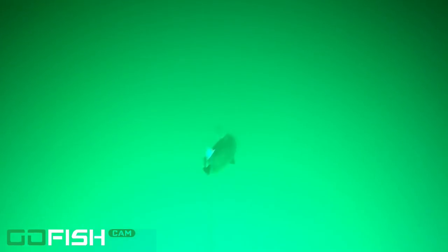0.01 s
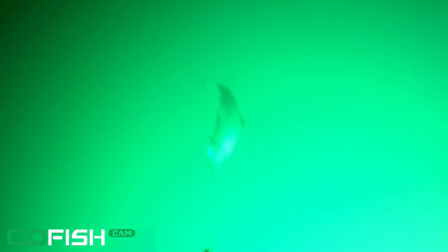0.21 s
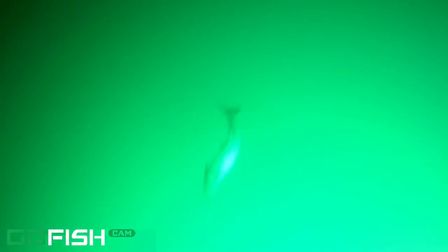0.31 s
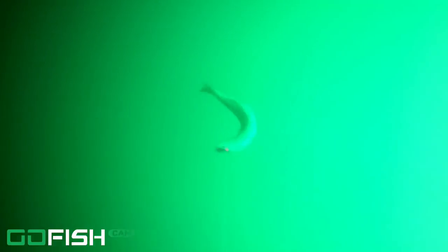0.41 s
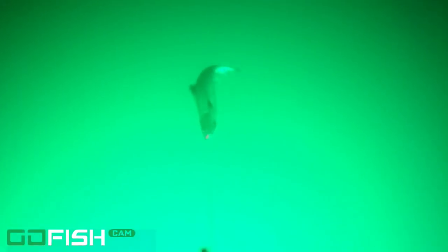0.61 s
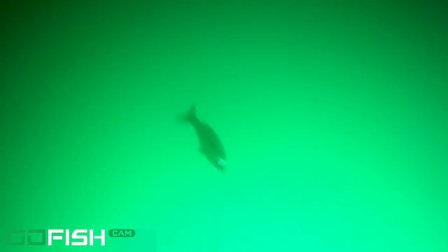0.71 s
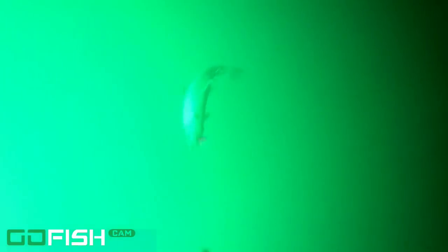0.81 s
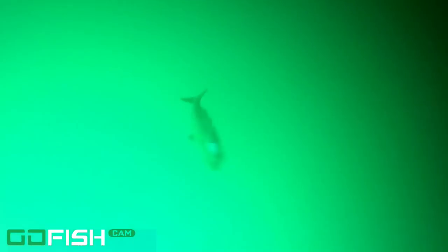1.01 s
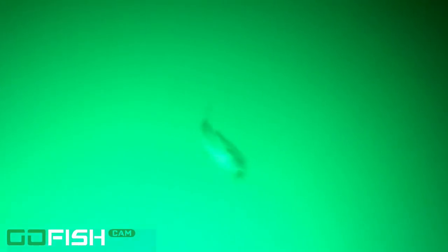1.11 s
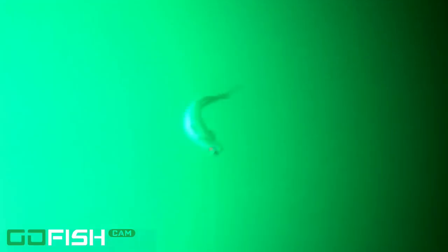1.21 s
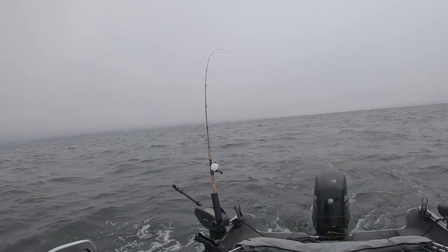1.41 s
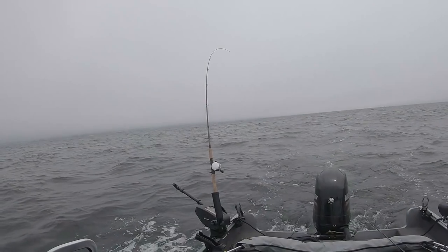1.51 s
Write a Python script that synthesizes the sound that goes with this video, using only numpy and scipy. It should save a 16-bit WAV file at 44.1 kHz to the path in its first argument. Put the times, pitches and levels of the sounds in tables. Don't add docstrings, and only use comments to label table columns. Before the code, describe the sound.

Loud, dry, creaky rattling of a fishing line on a small plastic underwater housing, in irregular bursts with brief gaps over faint rushing water, then a click and a sudden cut to quiet wind and low engine throb.

```python
import sys
import numpy as np
from scipy import signal
from scipy.fft import rfft, irfft, next_fast_len
from scipy.io import wavfile
from scipy.ndimage import uniform_filter1d, minimum_filter1d, map_coordinates

SR = 44100
rng = np.random.default_rng(int(sys.argv[2]) if len(sys.argv) > 2 else 0)


def gain_from_db(level_db):
    decades = np.asarray(level_db, float) / 20
    return 10 ** decades


def put_to_file(sound):
    columns = np.atleast_2d(sound).T
    safe = np.clip(columns, -1, 1)
    whole_steps = np.round(safe * 32767)
    wavfile.write(sys.argv[1], SR, whole_steps.astype(np.int16))


N = 70560
T = np.arange(N) / SR

# start in seconds, length in seconds, level in dB,
# low housing ring compared with the main ring in dB.
SCRAPES = [(0.002, 0.04, -31, 8), (0.05, 0.02, -32, 8.5), (0.116, 0.017, -34, -2),
           (0.144, 0.011, -24.5, 13.5), (0.157, 0.013, -21.5, 11), (0.198, 0.011, -27, 20.5),
           (0.203, 0.047, -11.5, 1), (0.249, 0.033, -17.5, -1), (0.279, 0.044, -22.5, 5),
           (0.32, 0.027, -16.5, 8), (0.355, 0.023, -12, 6), (0.375, 0.02, -23, 2), (0.391, 0.029, -19, 11),
           (.438, 0.004, -39, -12.5), (0.488, 0.02, -26, 14), (0.505, 0.032, -12.5, 6.5),
           (0.544, 0.043, -8, -2), (0.582, 0.028, -16, 3), (0.618, 0.031, -19.5, 3.5),
           (0.641, 0.024, -12, 4.5), (0.659, 0.021, -24.5, -1), (0.721, 0.013, -25.5, 12),
           (0.795, 0.028, -23.5, 13.5), (0.822, 0.02, -24, 15), (0.835, 0.051, -8.5, -3.5),
           (0.881, 0.042, -25.5, 5.5), (0.932, 0.016, -12.5, 9), (0.946, 0.037, -7.5, 0.5),
           (0.988, 0.015, -24.5, 8.5), (1.004, 0.026, -20, 8), (1.025, 0.032, -20, 10),
           (1.05, 0.028, -29, 10.5), (1.1, 0.023, -14.5, 9), (1.133, 0.012, -7, 13), (1.142, 0.015, -6, -1),
           (1.156, 0.028, -20, 10.5), (1.179, 0.088, -12.5, 3.5), (1.3, 0.04, -40.5, -2)]
SCRAPE_RISE_S, SCRAPE_FALL_S = 0.0054, 0.008
# time in seconds, peak in dB.
TICKS = [(0.0545, -24.5), (0.0599, -25), (0.0632, -27), (0.1246, -22.5), (0.148, -25), (0.1633, -25),
         (0.44, -22), (0.479, -19), (0.726, -20), (1.3037, -26.5)]
# time in seconds, peak in dB, ringing pitch in Hz.
JOLTS = [(0.0635, -21.5, 2586), (0.1271, -19.5, 3040), (0.151, -17, 2860), (0.1625, -17.5, 2680),
         (0.2103, -5, 2690), (0.2195, -9, 2530), (0.2324, -2.5, 2790), (0.2398, -1, 2830),
         (0.2597, -8.3, 2740), (0.2905, -5.5, 2610), (0.3034, -9, 2460), (0.313, -9.5, 2480),
         (0.335, -5, 2380), (0.3636, -8, 2520), (0.3668, -7.5, 2520), (0.4055, -6.5, 2460),
         (0.4136, -9.5, 2370), (0.4412, -17.5, 2690), (0.4987, -16, 2960), (0.5168, 0.4, 2660),
         (0.525, -4.5, 2630), (0.5322, -4.5, 2740), (0.5515, -3, 2790), (0.5595, -0.5, 2620),
         (0.5696, 0.25, 2740), (0.5736, -3.5, 2850), (0.5903, -7, 2600), (0.6035, -10, 2360),
         (0.6344, -9, 2580), (0.656, -6.5, 2640), (0.8001, -15, 2630), (0.8113, -9.5, 2880),
         (0.8315, -14.5, 2750), (0.8406, -8.2, 2700), (0.8464, -4, 2510), (0.8573, 2.33, 2580),
         (0.867, -2, 2640), (0.8763, -9, 2580), (0.8808, -5, 2900), (0.8988, -13, 2630),
         (0.9392, -8.5, 2960), (0.9599, -0.5, 2940), (0.968, 1.2, 2690), (0.9732, 1.3, 2530),
         (1.0185, -15, 2583), (1.0393, -14.5, 2770), (1.0458, -11.7, 2660), (1.1093, -6.5, 2740),
         (1.1161, -16, 2860), (1.141, -3, 2640), (1.1497, -0.8, 2800), (1.1643, -7.5, 2630),
         (1.1966, -7.4, 2810), (1.2051, -3, 2730), (1.2129, -4, 2620), (1.2445, -6.5, 2840),
         (1.2599, -6, 2850)]
JOLT_BEAT, JOLT_LOW = 0.54, 0.12
# time in seconds, regular slips per second, regular share from 0 to 1.
CREAK = [(0, 600, .2), (.22, 670, .45), (.272, 810, .75), (.305, 555, .55), (.37, 585, .45),
         (.415, 500, .35), (.53, 610, .4), (.56, 700, .4), (.655, 750, .5), (.81, 680, .45), (.87, 700, .3),
         (.94, 600, .35), (1.11, 560, .3), (1.185, 575, .75), (1.207, 655, .8), (1.222, 625, .8),
         (1.233, 725, .7), (1.27, 715, .75)]
# pitch in Hz, width in Hz, level in dB.
SHELL = [(2136, 210, 1.5), (2428, 404, 6.5), (2690, 490, 7), (3290, 470, -2.5), (3750, 110, -45)]
# pitch in Hz, width in Hz, level in dB.
SHELL_LOW = [(796, 380, -24.5), (1270, 540, -14), (1381, 294, -2), (1757, 450, -4.5)]
# pitch in Hz, width in Hz, level in dB.
SHELL_TOP = [(5035, 370, -24), (9130, 2200, -39)]
# pitch in Hz, width in Hz, level in dB.
TICK_MODES = [(3950, 260, 9), (4960, 500, 0)]
# pitch in Hz, width in Hz, level in dB.
BODY = [(682, 380, -21.5)]
# start in seconds, length in seconds, first Hz, last Hz,
# level in dB.
OVERTONES = [
    (.204, 0.029, 1320, 1274, -24.5),
    (.253, 0.029, 3420, 3210, -24),
    (.298, .022, 1685, 1626, -26),
    (.522, 0.022, 2860, 3020, -21),
    (.563, .02, 3475, 3410, -18.5),
    (.644, .02, 1520, 1474, -23),
]
# start in seconds, length in seconds, first Hz, last Hz, level in dB.
WHISTLES = [(0, .115, 555, 530, -43), (.11, .11, 525, 560, -42), (.29, .06, 580, 500, -46),
            (.375, .055, 580, 380, -46), (.43, .065, 560, 530, -46), (.59, .025, 540, 520, -48),
            (.685, .035, 530, 540, -44), (.745, .06, 510, 550, -46), (.81, .04, 470, 430, -45),
            (.8, .055, 720, 600, -45), (.91, .045, 500, 600, -49), (.99, .07, 430, 340, -49),
            (1.085, .09, 520, 470, -47), (1.165, .04, 540, 620, -47), (1.195, .045, 650, 635, -40),
            (1.23, .045, 570, 440, -45)]
# time in seconds, level in dB, pitch in Hz.
THUDS = [
    (0.507, -40.5, 92),
    (0.569, -63, 50),
    (0.968, -54, 61),
]
# start in seconds, length in seconds, level in dB.
BUBBLES = [
    (0.357, 0.013, -50),
    (0.412, 0.009, -42),
    (0.477, 0.033, -51),
    (1.028, 0.007, -43.5),
    (1.093, 0.033, -48),
    (0.706, .02, -55),
]
# frequency in Hz, level in dB.
FLOW = [(30, -34), (200, -20.5), (450, -13.5), (800, -16), (1200, -9), (1800, -22.5), (2700, -7.5),
        (4000, -20), (4700, -22), (6000, -34), (8000, -120)]
# frequency in Hz, level in dB.
HISS = [(3000, -37), (4800, -1.5), (6500, 2.5), (8000, 3.5), (14600, 4), (15400, 8.5), (15900, 4)]
# time in seconds, throb in dB, fourth order in dB.
ENGINE = [(1.345, -44, -41.5), (1.359, -31.5, -39), (1.374, -33.5, -51), (1.421, -32, -42.5),
          (1.463, -36, -42), (1.487, -43, -51), (1.507, -45, -43.5), (1.541, -41, -52), (1.6, -35, -66)]
# frequency in Hz, level in dB.
WIND = [(20, -10), (45, 0.5), (90, -9), (230, -14), (450, -23), (1300, -22), (5900, -37), (7200, -45.5),
        (9000, -65), (10200, -74), (12000, -120)]
CUT_S = 1.33516


def scrape_pushes():
    shapes = []
    for start, length, db, _ in SCRAPES:
        swell = np.sin(np.pi * np.clip((T - start) / length, 0, 1))
        arch = 0.65 + 0.35 * np.minimum(1, length / 0.025 * swell)
        shapes.append(gain_from_db(db) * stroke(start, length, SCRAPE_RISE_S, SCRAPE_FALL_S) * arch)
    shapes = np.array(shapes)
    return shapes.sum(0), gain_from_db(np.array(SCRAPES)[:, 3]) @ shapes


def creak():
    s, rate, share = np.transpose(CREAK)
    cycles = np.cumsum(np.interp(T, s, rate) * (1 + 0.055 * wobble(250))) / SR
    clicks = np.diff(np.floor(cycles), prepend=0) * gain_from_db(2.2 * rng.standard_normal(N))
    return unit(clicks - clicks.mean()), np.interp(T, s, share)


def slips():
    chatter_db = 0
    draw = rng.random((3, N))
    size = gain_from_db(-2.5 * np.log(draw[1] + 1e-4) + chatter_db * wobble(140))
    return unit((draw[0] < 4000 / SR) * np.sign(draw[2] - 0.5) * size)


def scraping(push, low_push):
    shell, shell_low = resonances(SHELL), resonances(SHELL_LOW)
    tap = filtered(1.0 * (np.arange(N) == 0), shell)
    tap_size, tap_peak = np.linalg.norm(tap), np.abs(tap).max()

    ticks, grip = np.zeros(N), gain_from_db(1.6 * wobble(130))
    for s, db in TICKS:
        ticks[round(s * SR)] = gain_from_db(db)
        grip = grip * (1 - min(gain_from_db(db), 0.8) * np.exp(-((T - s) / 0.0015) ** 2))

    clicks, share = creak()
    even = np.sqrt(grip * share) * clicks
    rough = grip * np.sqrt(1 - share) * slips()
    rub = filtered(even * push, shell) + filtered(even * low_push, shell_low)
    rub += gliding(rough * push, SHELL) + gliding(rough * low_push, SHELL_LOW)
    rub = sealed(rub / tap_size)

    blows = sealed(filtered(ticks, lambda f: shell(f) + 2.5 * shell_low(f)) / tap_peak)
    light = filtered(ticks * (ticks < 0.2), resonances(TICK_MODES)) / tap_peak
    top = filtered(slips() * push, resonances(SHELL_TOP)) / tap_size
    body = gliding(rough * low_push, BODY) / tap_size
    snags, free = jolts()
    return limited(gain_from_db(-0.5) * rub) * free + snags + blows + top + light + body


def jolts():
    out, free = np.zeros(N + SR), np.ones(N + SR)
    t = np.arange(-200, 500) / SR
    draws = rng.uniform(-1.017, 1, (len(JOLTS), 2))
    for (s, db, hz), (side, turn) in zip(JOLTS, draws):
        rise_s = 0.0014 if db > -16 else 0.0004
        shape = np.where(t < 0, np.exp(-(t / rise_s) ** 2), np.exp(-np.abs(t / 0.0023) ** 1.22))
        wave = lambda ratio: np.cos(2 * np.pi * (hz * ratio * t + turn))
        neighbour = wave(1 + 0.1 * (side + np.sign(side)))
        ring = wave(1) + JOLT_BEAT * neighbour + JOLT_LOW * wave(0.5 + 0.13 * side)
        first = round((s + t[0]) * SR)
        out[first:][:len(t)] += gain_from_db(db + 0.5) * shape * ring / (1 + JOLT_BEAT)
        free[first:][:len(t)] *= 1 - 0.75 * shape
    return out[:N], free[:N]


def gliding(drive, modes):
    out = np.zeros(N)
    for mode in modes:
        lag = filtered(wobble(30) * 0.04, lambda hz: 1 / (2j * np.pi * hz + 60)) * SR
        ring = map_coordinates(filtered(drive, resonances([mode])), [np.arange(N) + lag], mode="nearest")
        out += gain_from_db(2.5 * wobble(45.02)) * ring
    return out


def sealed(x):
    low = signal.butter(N=8, Wn=3986, btype="low", fs=SR, output="sos")
    high = signal.butter(N=8, Wn=825, btype="high", fs=SR, output="sos")
    return signal.sosfilt(high, signal.sosfilt(low, x))


def limited(x):
    need = np.minimum(1, 0.72 / (np.abs(x) + 1e-9))
    return x * uniform_filter1d(minimum_filter1d(need, size=122), size=61)


def cut_click():
    swell = np.exp(np.minimum(T - CUT_S, 0) / 0.00024)
    return gain_from_db(-5.5) * swell * np.cos(2 * np.pi * 2750 * (T - CUT_S) + 0.6)


def whistle(rows):
    waver, out = 1 + 0.04 * wobble(90), np.zeros(N)
    for s, length, first_hz, last_hz, db in rows:
        hz = np.interp(T, [s, s + length], [first_hz, last_hz]) * waver
        out += gain_from_db(db) * stroke(s, length, 0.012, 0.012) * np.sin(2 * np.pi * np.cumsum(hz) / SR)
    return np.sqrt(2) * gain_from_db(3 * wobble(49.45)) * out


def soft_bumps():
    out = np.zeros(N)
    for s, db, hz in THUDS:
        out += gain_from_db(db) * np.exp(-((T - s) * hz * 1.9) ** 2) * np.sin(2 * np.pi * hz * (T - s))
    return out


def bubbles():
    fizz = unit(filtered(rng.standard_normal(N), resonances([(10460, 1600, 0)])))
    return fizz * sum(gain_from_db(db) * stroke(s, length, 0.0039, 0.004) for s, length, db in BUBBLES)


def murmur():
    return gain_from_db(-46.5) * unit(filtered(rng.standard_normal(N), resonances([(491, 197, 0)])))


def water_gain(push):
    hold = 700
    held = -minimum_filter1d(-push ** 2, size=hold, origin=hold // 2 - 1)
    heard = filtered(held, lambda hz: 1 / (1 + 2j * np.pi * hz * 0.011))
    return (1 + np.abs(heard) / gain_from_db(2 * -19.5)) ** -0.5


def under_water():
    push, low_push = scrape_pushes()
    rattle = scraping(push, low_push)
    hum = murmur()
    pocket = bubbles() + soft_bumps() + whistle(WHISTLES)
    flow = gain_from_db(-38.5 + 1.5 * wobble(31.37)) * rush(FLOW, 1.5)
    hiss = gain_from_db(-45.5) * rush(HISS, 0.7)
    return rattle + pocket + water_gain(push) * (flow + hiss + hum)


def deck():
    s, throb_db, order_db = np.transpose(ENGINE)

    def tone(hz):
        return np.sqrt(2) * np.sin(2 * np.pi * np.cumsum(hz * (1 + 0.016 * wobble(30.1))) / SR)

    throb = gain_from_db(np.interp(T, s, throb_db)) * tone(40.8)
    order = gain_from_db(np.interp(T, s, order_db)) * tone(158.9)
    wind = gain_from_db(-40 + 1.0 * wobble(10.6)) * rush(WIND, 1.2)
    return throb + order + wind


def rush(points, patchy_db):
    z = signal.stft(rng.standard_normal(N), nperseg=512)[2]
    patches = uniform_filter1d(uniform_filter1d(rng.standard_normal(z.shape), 6, 0), 8, 1)
    x = signal.istft(z * gain_from_db(patchy_db * unit(patches)), nperseg=512)[1][:N]
    f, db = np.transpose(points)
    return unit(filtered(x, lambda hz: gain_from_db(np.interp(np.log(hz + 1), np.log(f + 1), db))))


def unit(x):
    return x / np.sqrt(np.mean(x ** 2) + 1e-20)


def wobble(rate):
    return map_coordinates(rng.standard_normal(int(N * rate / SR) + 4), [T * rate])


def filtered(x, response):
    m = next_fast_len(N + SR // 2)
    return irfft(rfft(x, m) * response(np.fft.rfftfreq(m, 1 / SR)), m)[:N]


def resonances(modes):
    peak = lambda f, c, w: 1j * f * w / (c * c - f * f + 1j * f * w)
    return lambda f: sum(gain_from_db(db) * peak(f, c, w) * peak(f, c, 2 * w) for c, w, db in modes)


def stroke(start, length, rise, fall):
    dying = np.exp(-np.clip(T - start - length + fall, 0, None) / (fall * 0.7))
    return np.clip((T - start) / rise, 0, 1) * dying


def scene():
    below = under_water() + cut_click()
    above = deck()
    return np.where(T < CUT_S, below + whistle(OVERTONES), above)[None]


def top_cut(x):
    return signal.sosfilt(signal.butter(12, 15900, fs=SR, output="sos"), x)


def record(dry):
    clipped = dry[0] / (1 + np.abs(dry[0]) ** 30) ** (1 / 30)
    water = clipped * (T < CUT_S + 0.01)
    too_high = filtered(water, lambda hz: 1 - np.clip((15880 - hz) / 150, 0, 1))
    return top_cut((clipped - too_high)[None])


dry = scene()
out = record(dry)
put_to_file(out)
```